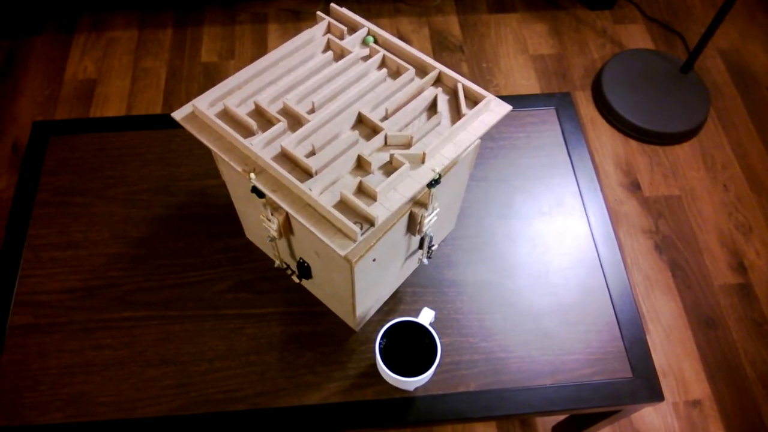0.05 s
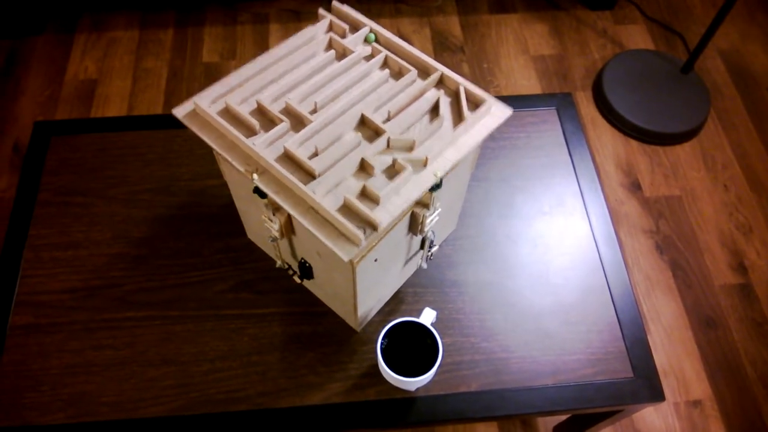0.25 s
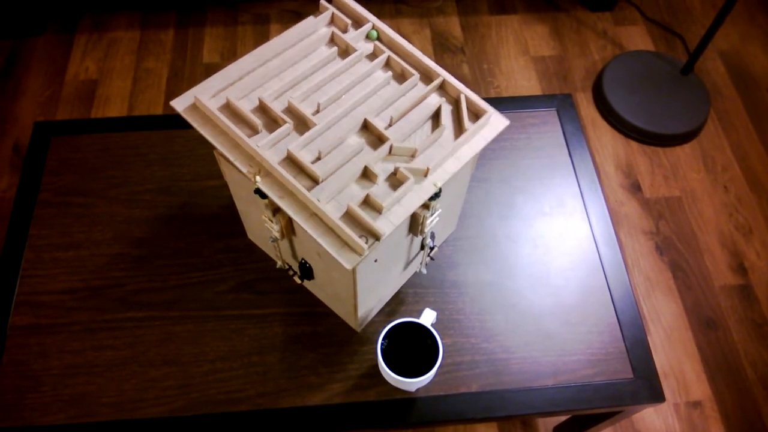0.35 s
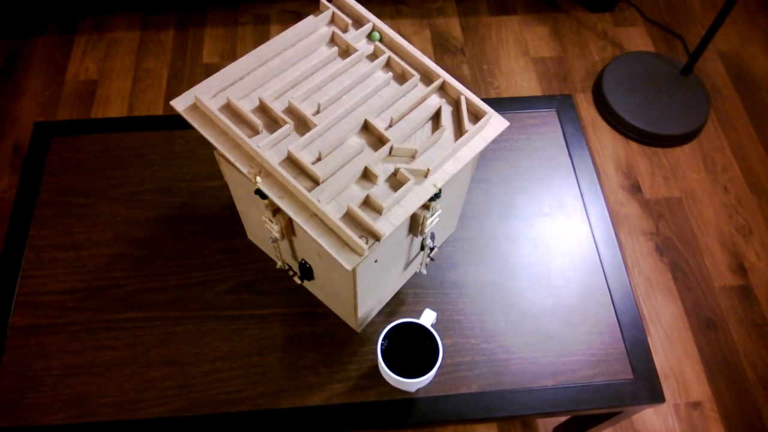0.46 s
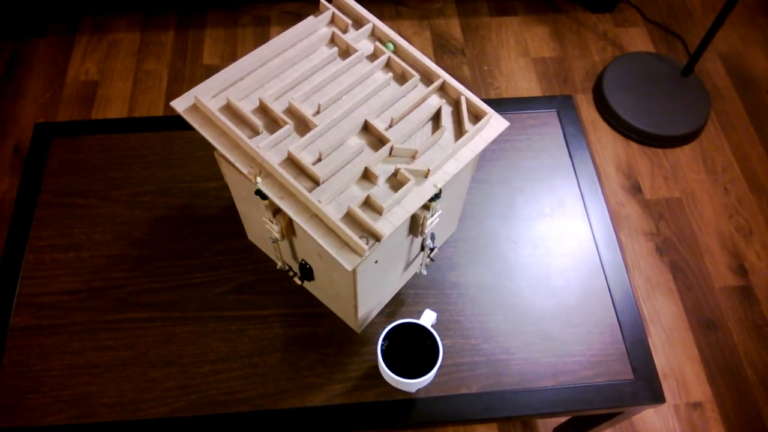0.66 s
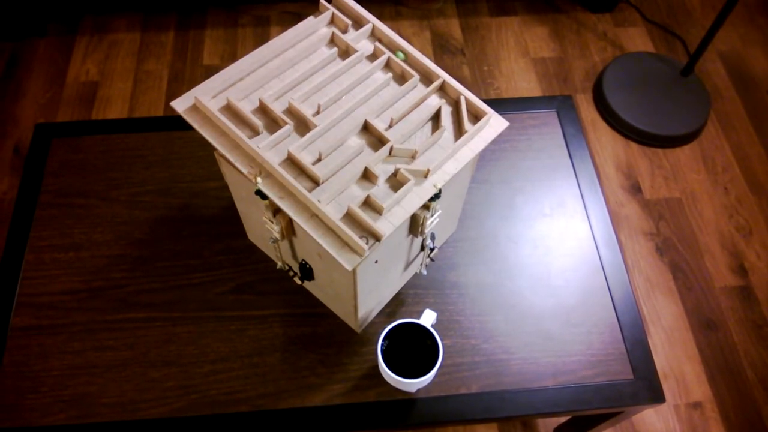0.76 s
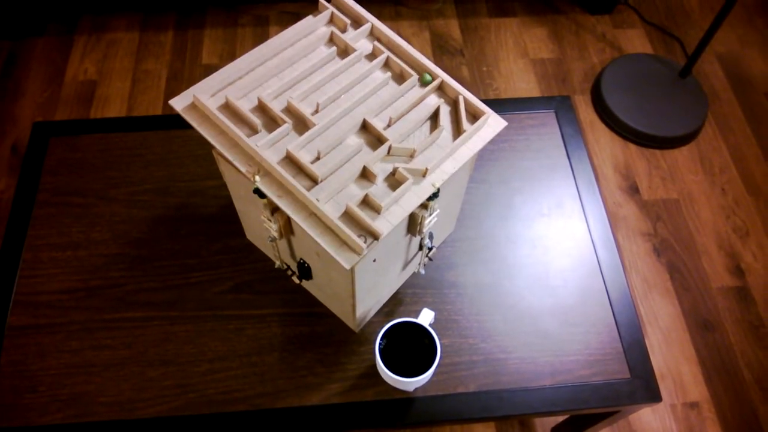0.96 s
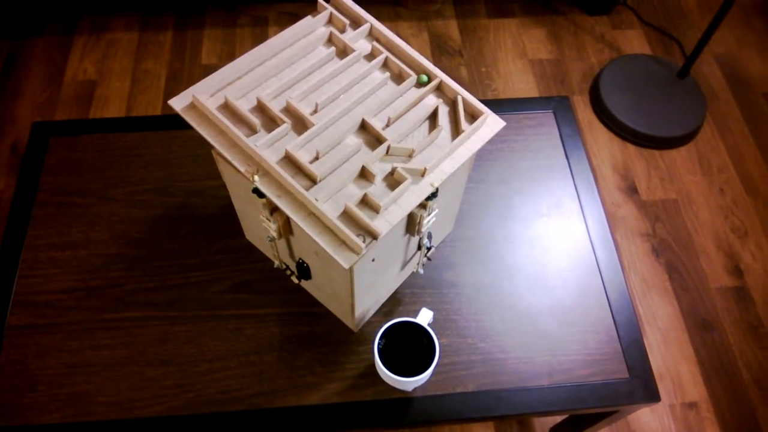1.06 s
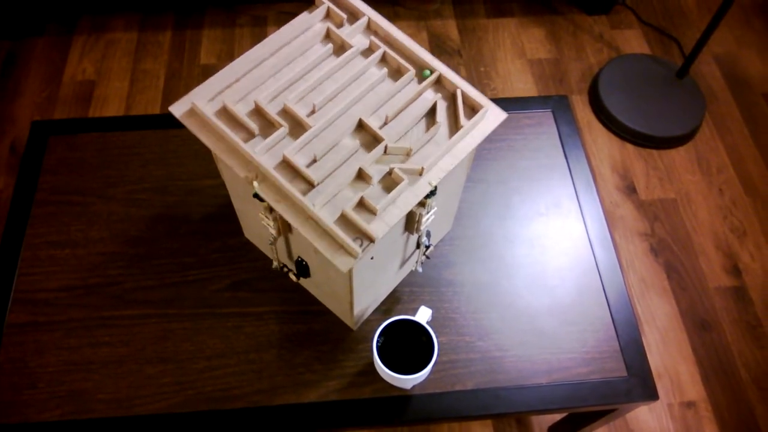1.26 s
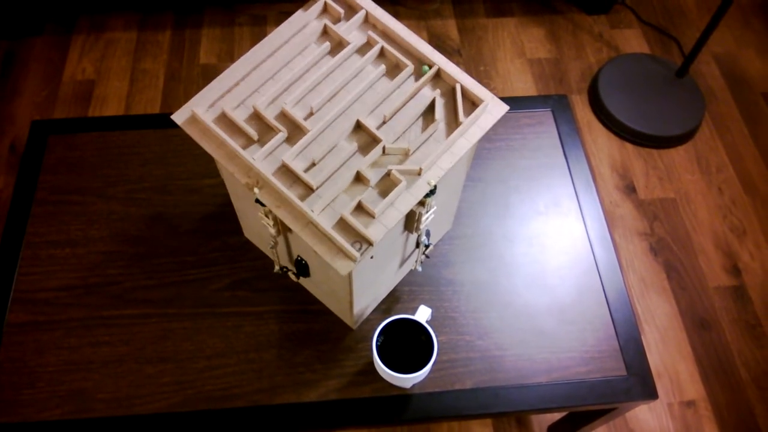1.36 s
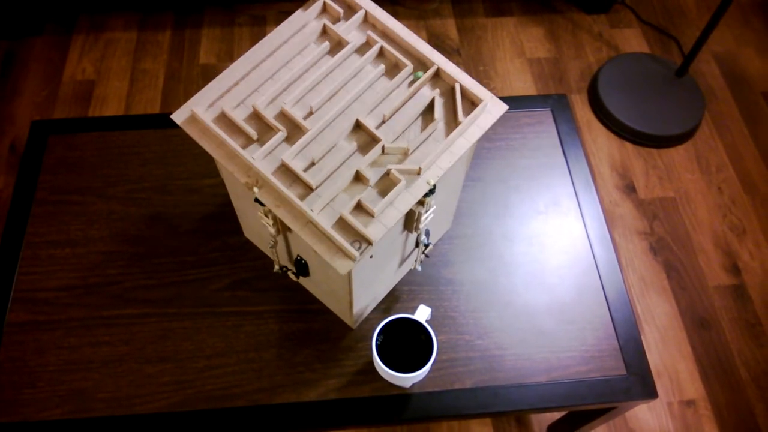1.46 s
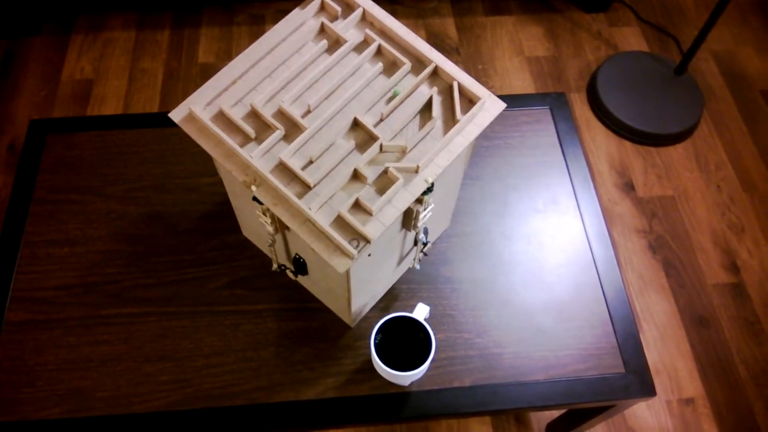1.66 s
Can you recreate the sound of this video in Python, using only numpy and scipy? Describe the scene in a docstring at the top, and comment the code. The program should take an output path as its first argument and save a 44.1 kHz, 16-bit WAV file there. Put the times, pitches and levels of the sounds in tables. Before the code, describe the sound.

Small motors tilt a wooden marble maze with a short, scraping, creaky whir. The marble rolls softly and clacks against a wall, then a second whir follows, heard close by in a quiet small room.

```python
"""Motor-driven marble maze

Small motors tilt a wooden maze on a table in a small room. Twice the drive swings the board: its gears whine,
and stick-slip friction excites the modes of the box, with short creaks and soft thuds. The marble rattles at
the start, and its first tap rings briefly; between the swings it rolls along a lane and knocks against the
walls."""
import sys
import numpy as np
from scipy import signal
from scipy.fft import rfft, irfft
from scipy.io import wavfile

SR = 44100
rng = np.random.default_rng(int(sys.argv[2]) if len(sys.argv) > 2 else 0)


def materialize(psi):
    """Save the field psi as 16-bit PCM at rate SR to the path in sys.argv[1].

    A 1-D psi becomes a single channel; in a 2-D psi each row is a channel.
    """
    bounded = np.clip(np.atleast_2d(psi).T, -1, 1)
    quanta = np.round(bounded * 32767).astype(np.int16)
    wavfile.write(sys.argv[1], SR, quanta)


N = 74970


def rubbing(swing, spectrum):
    """Stick-slip friction: dense pulses excite the box; bass, middle and treble swell with the swing."""
    # modes of the box: f/Hz, level over the plain rubbing/dB, T60/s
    box_modes = [(275.8, 6.5, 0.086), (401.7, 12, 0.77), (436.3, 10.5, 0.33), (636.7, 11.5, 0.27),
                 (858, 14, 0.49), (1202, 8.5, 1), (1320, -1, 0.61), (1698.3, 11.5, 0.18), (1790, -2, 0.91),
                 (2208, 15, 0.55), (2404, 3.5, 0.638), (3640, 2, 0.41), (4386, 10.5, 0.056)]
    t = clock()
    slips = clicks(per_s=9000, scatter_db=1) * undb(0.9 * walk(per_s=98.6))  # with a slight judder
    box = sum((undb(db) - 1) * 2 * np.log(1000) / (t60 * SR) * fade(t60) * np.cos(2 * np.pi * hz * t)
              for hz, db, t60 in box_modes)
    fine_modes = rng.standard_normal(N) * fade(t60=0.089)  # so crowded that they ring as noise
    fine_gain = undb(1)
    overtones = fine_gain * band(conv(slips, fine_modes / np.linalg.norm(fine_modes)), 2660, 18300)
    wood = colour((slips + overtones) / np.hypot(1, .5 * fine_gain) + conv(slips, box), spectrum)
    times, treble_db, middle_db, bass_db = np.array(swing).T
    low, low_and_mid = below(wood, hz=692), below(wood, hz=3450)
    # signal, level/dB, reference band/Hz
    parts = [(low, bass_db - 6.5, (130, 600)),
             (low_and_mid - low, middle_db - 6, (1000, 3000)),
             (wood - low_and_mid, treble_db - 2, (4000, 15000))]
    out = 0
    for part, db, reference in parts:
        envelope = undb(np.interp(t, times, db, left=-np.inf, right=-np.inf))
        out = out + part / band(wood, *reference).std() * envelope
    # the top of the hiss goes first as the board slows
    full_hiss_db = -38
    brightness = undb(0.7 * np.minimum(np.interp(t, times, treble_db) - full_hiss_db, 0))
    dull = below(out, hz=11460)
    return dull + brightness * (out - dull)


def board_swings():
    """Sliding friction sounds while the board tilts: two swings, each with its own spectrum."""
    # envelopes of each swing: t/s, relative level/dB of treble, middle and bass
    swings = [
        [(0.18, -78, -47, -55.5), (0.226, -31, -32.5, -30), (0.258, -29, -33.5, -34.5),
         (0.312, -36.5, -33, -24), (0.32, -34, -34, -27), (0.346, -30, -31.5, -31), (0.358, -32, -29, -34.5),
         (0.4, -37.5, -29, -27), (0.436, -43, -34.5, -37), (0.452, -44, -32, -40), (0.55, -62, -49, -48),
         (0.62, -89, -62.5, -85)],
        [(1.16, -97.5, -74, -105), (1.174, -66, -47, -44.5), (1.188, -43.5, -29, -36), (1.198, -33, -27.5, -37),
         (1.24, -37.5, -34.5, -36), (1.268, -36.5, -31, -41.5), (1.352, -32, -32, -36.5),
         (1.376, -33.5, -26.5, -27.5), (1.406, -41.5, -32, -40), (1.432, -43.5, -36, -40.5),
         (1.524, -61.5, -45, -54.5), (1.58, -99, -86, -79)],
    ]
    # friction spectra of the two swings: f/Hz, level/dB
    first_spectrum = [(25, -10.5), (45, 1), (75, -13), (130, -1), (250, 3), (400, 6), (540, -6.5),
                      (820, -8.5), (1000, -8.5), (1200, 0), (1700, -3.5), (2500, -10.5), (4000, -11.5),
                      (7500, -5.5), (11000, -7), (15500, -15)]
    second_spectrum = [(25, -5), (70, -12.5), (130, -1), (240, 0.5), (450, 2), (580, -6), (980, -10.5),
                       (1200, 3.5), (2200, -0.5), (3600, -6), (4400, -6.5), (5400, -9), (6700, -4),
                       (7800, 5), (8700, -2), (12500, -6), (15500, -9.5)]
    return rubbing(swings[0], first_spectrum) + rubbing(swings[1], second_spectrum)


def gear_whine():
    """Tooth meshing: pitch and strength follow the speed as each motor spins up, holds and brakes."""
    # motor runs: start t/s, braking t/s, then for full speed: gear f/Hz, start and braking level/dB
    runs = [(.18, .365, 1817, -29.5, -45), (1.15, 1.335, 1085, -48, -41.5)]
    # partials of the whine: multiple of the gear frequency, level/dB
    partials = [(.6, -12), (1, -13), (2, -4), (3, 0), (4, -6)]
    spin_up_s, spin_down_s, flutter_db = .075, 0.044, 3
    t, out = clock(), 0
    for start, brake, hz, start_db, brake_db in runs:
        rise = np.sin(np.pi / 2 * np.clip((t - start) / spin_up_s, 0, 1))
        fall = np.cos(np.pi / 2 * np.clip((t - brake) / spin_down_s, 0, 1))
        speed = rise * fall
        wobble = 1 + .006 * walk(per_s=180)
        phase = 2 * np.pi * np.cumsum(hz * speed * wobble) / SR
        teeth = sum(undb(db + flutter_db * walk(per_s=180)) * np.sin(k * phase) for k, db in partials)
        out = out + teeth * speed ** 5.6 * undb(np.interp(t, [start, brake], [start_db, brake_db]))
    return out


def short_tones():
    """Short tones: mostly mode locking, where the slipping briefly follows one resonance and squeals, with a
    weak octave; the first tone is the ring of the marble's first tap."""
    # short tones: t/s, duration/s, f/Hz, level/dB; the first is the ring of the marble's first tap, the rest
    # are creaks
    tones = [(0.165, 0.024, 752, -51.5), (0.223, 0.022, 1689, -35.5), (0.25, 0.031, 1674, -37.5),
             (0.302, 0.063, 2190, -37), (0.371, 0.038, 1643, -37), (0.488, 0.086, 1198, -46),
             (1.301, 0.013, 3176, -42), (1.39, 0.076, 1301, -40)]
    flutter_db, wander_hz = 2.5, 32
    t, out = clock(), 0
    for start, length, hz, db in tones:
        arch = np.sin(np.pi * np.clip((t - start) / length, 0, 1))
        swell = arch * undb(db + flutter_db * walk(per_s=300))
        phase = 2 * np.pi * np.cumsum(hz + wander_hz * walk(per_s=300)) / SR
        out = out + np.sqrt(2) * swell * (np.sin(phase) + undb(-8) * np.sin(2 * phase))
    return out


def thuds():
    """Soft impacts excite the low modes of the board, which radiates little deep bass."""
    # pushes of the board against its frame: t/s, relative level/dB
    pushes = [(0.251, -24.5), (0.29, -49), (0.447, -37.5), (1.224, -41.5), (1.361, -46)]
    # modes of the board: f/Hz, level/dB, T60/s
    board_modes = [(258.7, 7, 0.11), (389.7, -2.5, 0.12), (798.6, -5, 0.1)]
    push_s = 0.0035
    thud = band(ring(board_modes) * np.minimum(clock() / push_s, 1), lo_hz=119, hi_hz=3020)
    return sum(undb(db) * start_at(thud, start) for start, db in pushes)


def marble_knocks():
    """Hard impact: the marble excites the modes of a wall, and the board beneath knocks hollowly."""
    # impacts: t/s, relative level/dB of the clack and of the hollow knock
    impacts = [(.156, -52.5, -41.5), (0.7186, -80, -58), (0.7516, -85, -50.5), (0.9982, -23.5, -34.5),
               (1.020, -35, -29), (1.034, -35, -29.5)]
    # modes of a struck wall: f/Hz, level/dB, T60/s
    wall_modes = [(3010, -2, 0.015), (3390, -14.5, 0.015), (4150, -5, 0.021), (4760, -4.5, 0.034),
                  (6050, -23, 0.0099), (6470, -16, 0.016)]
    # spectra of the contact crack and of the hollow knock: f/Hz, level/dB
    crack_spectrum = [(100, -42.5), (400, -18), (800, -16), (2400, 3), (3250, 19.5), (3900, 3.5),
                      (6700, -6), (7600, -14), (15000, -30.5)]
    hollow_spectrum = [(30, -46), (130, -13), (330, 4), (550, -6.5), (800, 5), (1050, 4.5), (1430, 14),
                       (1700, -1.5), (2060, 10), (2900, 0), (4000, -12.5), (6500, -18), (10000, -48)]
    split_hz, full_tick_db = 6700, -30.5
    clack = undb(-4.5) * burst(crack_spectrum, t60=0.021) + undb(-6) * ring(wall_modes)
    hollow = burst(hollow_spectrum, t60=0.026)
    body = butterworth(clack, split_hz, "low", order=10)
    tick = butterworth(clack, split_hz, "high", order=6)
    clacks, hollows_and_ticks = 0, 0
    for start, clack_db, hollow_db in impacts:
        # in soft impacts the level of the tick falls twice as fast as that of the clack
        tick_db = 1.5 + clack_db + min(clack_db - full_tick_db, 0)
        clacks += undb(clack_db) * start_at(body, start)
        hollows_and_ticks += start_at(undb(hollow_db) * hollow + undb(tick_db) * tick, start)
    return room(clacks, wet_db=1) + room(hollows_and_ticks, wet_db=-11.5)


def marble_clatter():
    """Dense random impacts merge into a brief rattle, already dying away at the start."""
    # spectrum of the rattle: f/Hz, level/dB
    spectrum = [(100, -4), (240, -15), (320, 6.5), (550, -15.5), (780, -0.5), (1250, -5.5), (1600, 2.5),
                (3000, 0), (3650, 1), (4500, -7.5), (5900, -16), (7000, -30.5), (15000, -46)]
    # its decay: t/s, level/dB
    decay = [(0, -42), (.066, -51.5), (.09, -58.5), (.3, -91)]
    times, db = np.array(decay).T
    rattle = unit(colour(clicks(per_s=5000, scatter_db=1.5), spectrum))
    return rattle * undb(np.interp(clock(), times, db, right=-np.inf))


def marble_rolling():
    """Roughness excitation: the marble bumps over the wood grain, brighter the harder it rolls."""
    # envelope of the roll: t/s, level/dB
    envelope = [(.70, -68.5), (0.759, -54.5), (0.831, -60.5), (0.885, -52), (0.921, -57), (0.949, -49),
                (1.0, -54), (1.119, -95), (1.55, -67), (1.61, -62), (1.7, -65)]
    # spectrum of the bumps: f/Hz, level/dB
    spectrum = [(100, -15), (220, -3.5), (315, 8.5), (400, 3.5), (520, -7), (650, 2.5), (770, 2),
                (1000, -3), (1500, -8.5), (2200, -9), (3500, -33), (8000, -51.5)]
    full_treble_db = -45.5
    level_db = np.interp(clock(), *np.array(envelope).T)
    bumps = unit(room(colour(clicks(per_s=700, scatter_db=4.5), spectrum), wet_db=0))
    low = below(bumps, hz=1090)
    return (low + (bumps - low) * undb(level_db - full_treble_db)) * undb(level_db)


def room(x, wet_db):
    """Reverberation: dense wall reflections build up and decay; the very top is absorbed."""
    build_s, delay_s = 0.0045, .006
    reflections = below(rng.standard_normal(N), hz=8800) * (1 - np.exp(-clock() / build_s))
    low = butterworth(reflections, 4000, "low", order=1)
    tail = start_at(low * fade(t60=0.36) + (reflections - low) * fade(t60=0.42), delay_s)
    return x + undb(wet_db) * conv(x, tail / np.linalg.norm(tail))


def room_air():
    """Stationary background noise, strongest in the bass."""
    # spectrum of the background: f/Hz, level/dB
    spectrum = [(20, -16), (45, 5), (65, -17.5), (100, 3.5), (170, -10), (320, -12), (600, -30),
                (1500, -22), (4000, -29), (15000, -37.5)]
    return undb(-66.5) * unit(colour(rng.standard_normal(N), spectrum))


def clicks(per_s, scatter_db):
    """Poisson impulses of random sign and log-normal size."""
    hits = rng.random(N) < per_s / SR
    return hits * np.sign(rng.standard_normal(N)) * undb(scatter_db * rng.standard_normal(N))


def ring(modes):
    """Free vibration: a sum of damped sines (f/Hz, level/dB, T60/s)."""
    return sum(undb(db) * fade(t60) * np.sin(2 * np.pi * hz * clock()) for hz, db, t60 in modes)


def burst(spectrum, t60):
    """Exponentially damped noise with a given spectrum."""
    noise = rng.standard_normal(N)
    return colour(noise * fade(t60), spectrum) / colour(noise, spectrum).std()


def walk(per_s):
    """Random fluctuation of unit RMS, interpolated between independent values."""
    steps = rng.standard_normal(N)
    return unit(np.interp(clock() * per_s, np.arange(N), steps))


def colour(x, spectrum):
    """Minimum-phase filter through points (f/Hz, level/dB)."""
    hz, db = np.array(spectrum).T
    bin_hz = np.arange(N + 1) * SR / (2 * N)
    gain = undb(np.interp(np.log(bin_hz + 1), np.log(hz), db))
    cepstrum = irfft(np.log(gain))
    cepstrum[1:N] *= 2  # folding the cepstrum makes the filter causal
    cepstrum[N + 1:] = 0
    return irfft(rfft(x, 2 * N) * np.exp(rfft(cepstrum)))[:N]


def butterworth(x, hz, kind, order):
    """Causal filter with a maximally flat passband."""
    return signal.sosfilt(signal.butter(order, hz, kind, fs=SR, output="sos"), x)


def band(x, lo_hz, hi_hz):
    """Causal band-pass."""
    return butterworth(x, [lo_hz, hi_hz], "band", order=3)


def below(x, hz):
    """Zero-phase low-pass: subtracting it leaves the treble."""
    return signal.sosfiltfilt(signal.butter(3, hz, fs=SR, output="sos"), x)


def fade(t60):
    """Exponential decay by 60 dB in t60 seconds."""
    return np.exp(-np.log(1000) * clock() / t60)


def start_at(x, seconds):
    """Pure time delay."""
    return np.concatenate([np.zeros(int(seconds * SR)), x])[:N]


def conv(x, response):
    """Convolution with an impulse response."""
    return signal.fftconvolve(x, response)[:N]


def undb(db):
    """Amplitude ratio of a level."""
    return 10 ** (np.asarray(db) / 20)


def unit(x):
    """Scaling to unit RMS."""
    return x / np.sqrt(np.mean(x ** 2))


def clock():
    """Sample times t/s."""
    return np.arange(N) / SR


def scene():
    """Superposition of drive, marble and background, the same in both channels."""
    friction, air = board_swings(), room_air()
    drive = room(friction, wet_db=-22) + room(gear_whine() + short_tones() + thuds(), wet_db=-14)
    marble = marble_knocks() + marble_clatter() + marble_rolling()
    mono = drive + marble + air
    return np.array([mono, mono])


def record(dry):
    """Band limiting: the microphone drops the deepest rumble, and the top is cut off."""
    low_hz, top_hz = 28, 15720
    heard = butterworth(dry, low_hz, "high", order=3)
    return signal.sosfilt(signal.ellip(10, .2, 70, top_hz, fs=SR, output="sos"), heard)


dry = scene()
out = record(dry)
materialize(out)
```